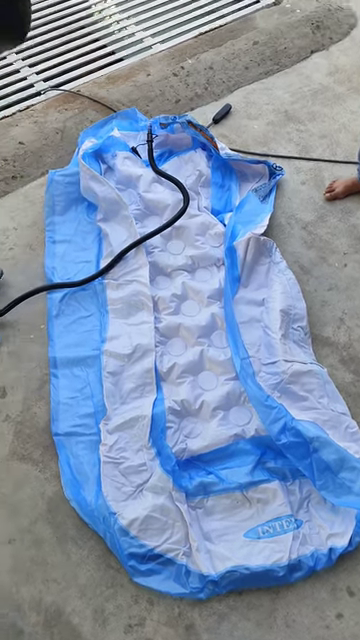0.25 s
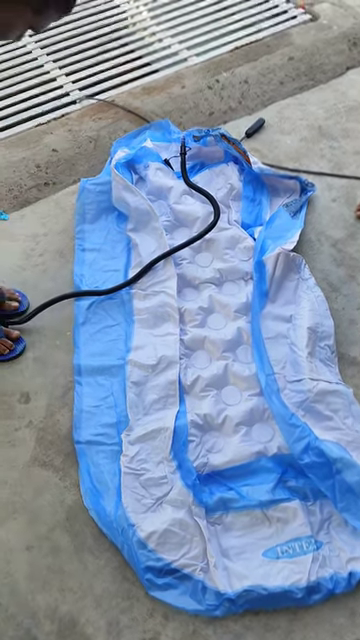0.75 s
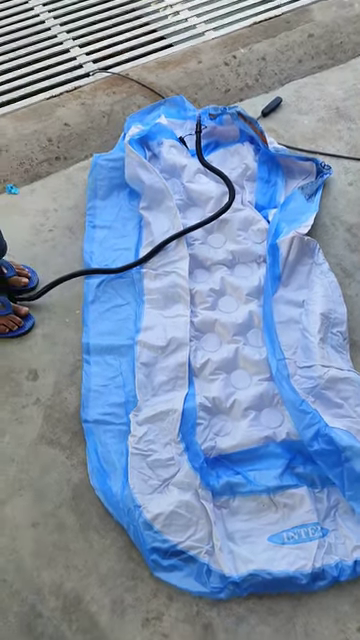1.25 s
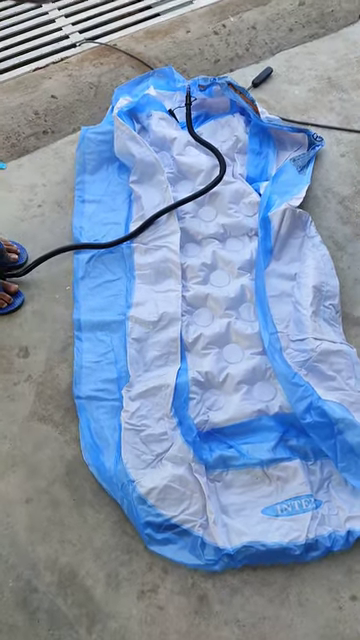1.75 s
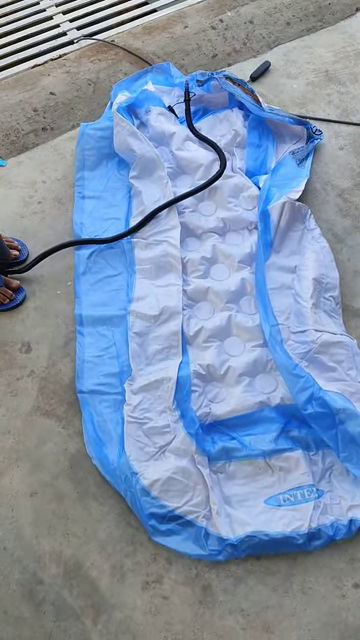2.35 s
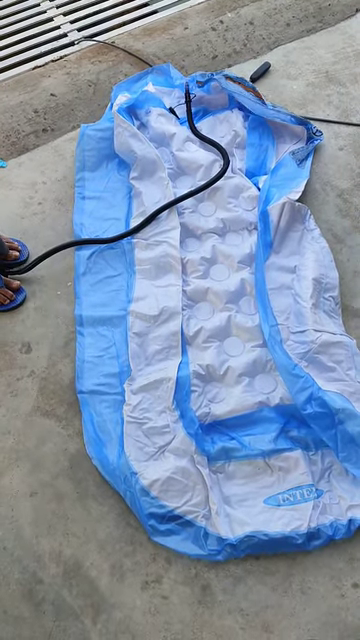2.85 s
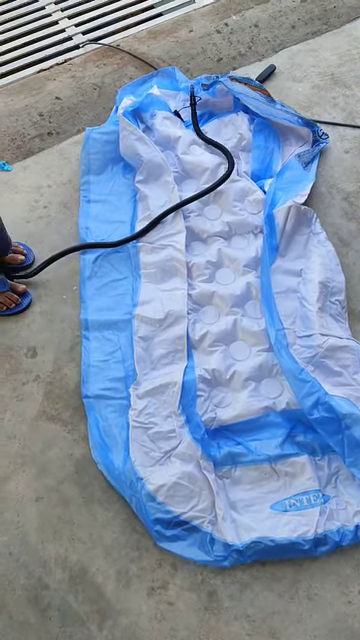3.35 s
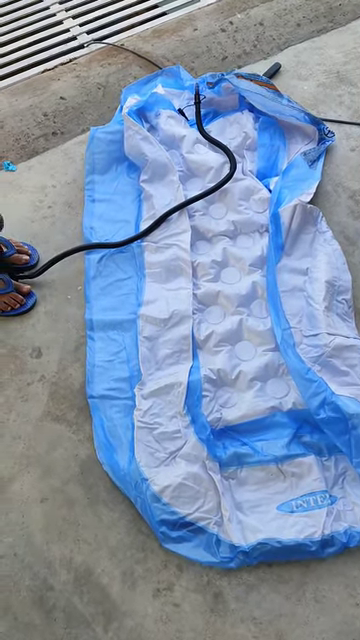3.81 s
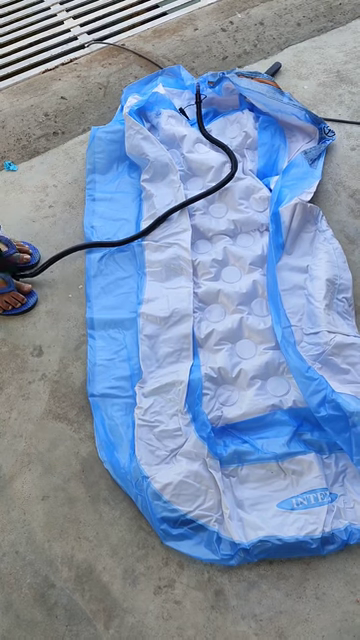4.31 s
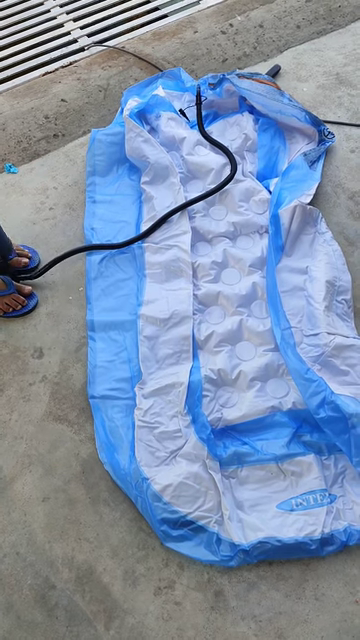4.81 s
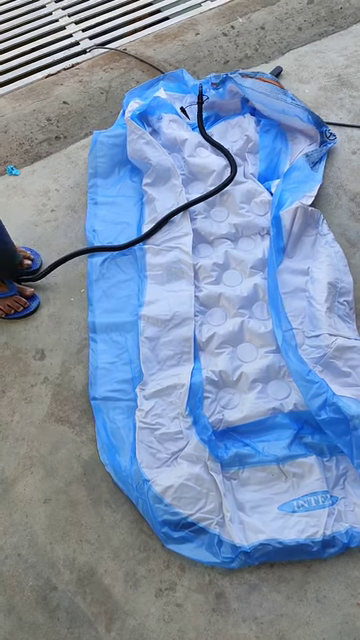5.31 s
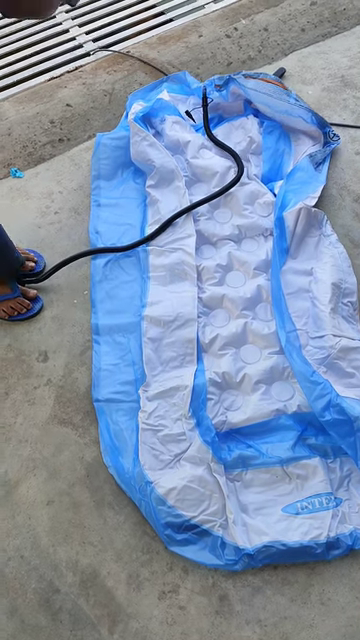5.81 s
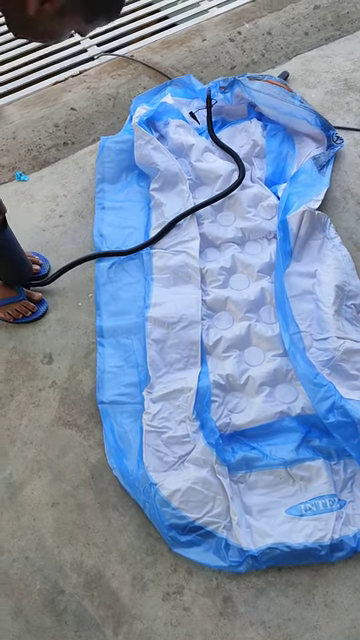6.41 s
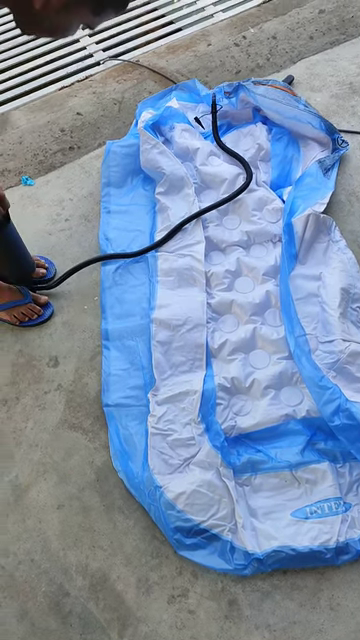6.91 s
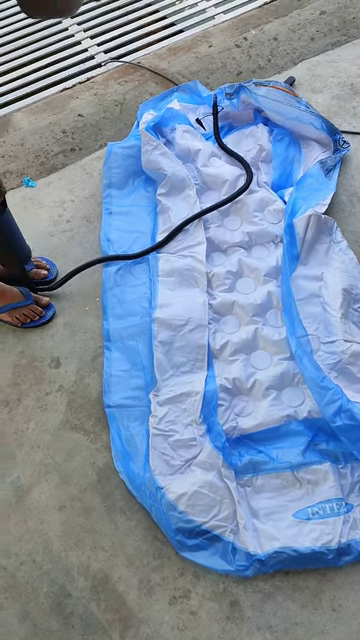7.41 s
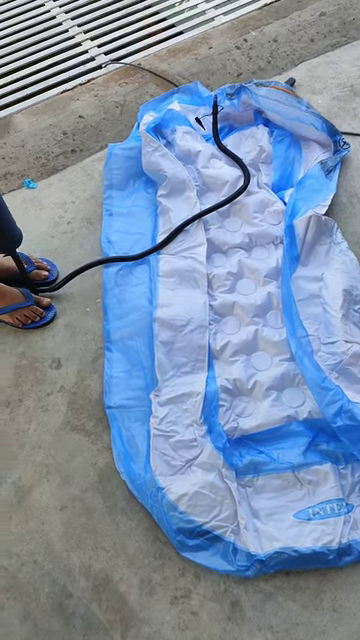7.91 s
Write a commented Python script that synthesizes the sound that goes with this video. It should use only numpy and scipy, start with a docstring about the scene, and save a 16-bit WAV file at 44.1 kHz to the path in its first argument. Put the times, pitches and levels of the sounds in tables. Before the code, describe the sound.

Rhythmic hisses and duller rushes of air come from a clacking foot pump, with steady insect chirr and low outdoor rumble.

```python
"""A knock and a short scuff on concrete, over steady insect chirr and low outdoor rumble; then a pump
is worked stroke after stroke beside a flat inflatable pool. Each push drives a hissing jet with a faint
nozzle whistle through the hose; each return draws a duller rush of air. As the stroke turns, the barrel
thumps and the frame clacks, echoed by the yard walls."""
import sys
import numpy as np
from scipy import signal
from scipy.fft import rfft, irfft
from scipy.io import wavfile
from scipy.ndimage import uniform_filter1d

SR = 44100
rng = np.random.default_rng(int(sys.argv[2]) if len(sys.argv) > 2 else 0)


def unload_audio(sound):
    """Save the sound as a 16-bit wav file, at the path given as the first command line argument."""
    columns = np.transpose(np.atleast_2d(sound))
    # keep every value between -1 and 1, then stretch to whole-number steps
    steps = np.round(np.clip(columns, -1, 1) * 32767)
    wavfile.write(sys.argv[1], SR, steps.astype(np.int16))


N = 359856

# Table levels are relative; each source adds its own gain.
# Outdoor noise spectra: f/Hz, density/dB
WIND_SPECTRUM = [(15, 16.5), (25, -17), (45, 16), (65, -16.0), (100, -45)]
DRONE_SPECTRUM = [(50, -15), (80, 1), (125, 1.5), (170, -4), (210, -1.5), (300, -28.5)]
WASH_SPECTRUM = [(88, -10), (150, -6), (298, -5.5), (938, -11.5), (1250, -18), (1980, -16), (3010, -21),
                 (3860, -17), (4580, 4.5), (6460, -9.5), (8120, -15), (14400, -100)]
INSECT_SPECTRUM = [(2120, -59), (3600, -56), (3780, -72), (4070, -8), (4260, -26), (4360, 3.5), (4760, 2.5),
                   (5400, -3.5), (6420, -18), (6520, -14.5), (9000, -21), (11700, -65), (19800, -120)]
# Outdoor envelopes: t/s, level/dB
WIND_LEVELS = [(0.0, -57), (1.4, -52), (4.1, -52), (4.6, -43.5), (6.1, -51.5), (8.16, -48)]
DRONE_LEVELS = [(0.0, -49), (0.45, -58.5), (4.0, -47.5), (6.0, -52), (8.16, -48)]
INSECT_LEVELS = [(0.0, -40), (3.7, -37.5), (4.4, -38.5), (6.25, -40.5), (6.9, -38.5), (8.16, -40)]
# Drag, return air and jet spectra: f/Hz, density/dB
SCUFF_SPECTRUM = [(71, -33), (120, 0), (289, -11), (350, 2.5), (649, -2), (808, 0), (1040, -6), (1470, -3),
                  (1710, -4.5), (4000, -14), (5200, -47), (8800, -120)]
RUSH_SPECTRUM = [(120, -72), (200, -17), (303, -9), (443, -8.5), (689, -5), (775, -1), (1020, -3.5),
                 (1310, 0), (1490, 6), (2930, 5), (4500, -14), (5850, -57), (9900, -120)]
HISS_SPECTRUM = [(1760, -26), (3000, -30), (3900, 2), (4540, -1.5), (5140, 0), (7180, 2), (8080, 5),
                 (12100, -5), (13700, -1), (14400, -9)]
# Noise-driven resonances: f/Hz, width/Hz, level/dB
SCUFF_RESONANCES = [(347, 37, -2), (504, 38, 1), (813, 53, -2), (1185, 88, -1.5), (1470, 90, -5)]
HOSE_RESONANCES = [(1001, 214, -1), (1636, 44, -3.5), (1967, 270, 0), (2590, 1200, -3.5), (3337, 490, 3)]
NOZZLE_RESONANCES = [(6140, 730, -8.5), (6825, 600, 2.5), (7320, 600, -1), (8190, 220, -7.5)]
# Pump body modes: f/Hz, level/dB, t60/s
BARREL_MODES = [(142.6, -9, 0.094), (177, -7.5, 0.031), (330, -7, 0.027), (416, -7.5, 0.048),
                (556, -2.5, 0.028), (702, -1, 0.032), (822.5, -4, 0.034), (878, -4.5, 0.069)]
FRAME_MODES = [(132, -4, 0.09), (173.2, -1.5, 0.17), (346, 0, 0.042), (438, 3.5, 0.023), (577, 7.5, 0.01),
               (884, -8.5, 0.06), (995, -6, 0.029), (1695, 1.5, 0.011), (2200, 3, 0.0098)]
# Thumps early in the returns: t/s, level/dB
RETURN_THUMPS = [(1.988, -16), (2.544, -12.5), (3.124, -13), (3.703, -13), (4.298, -13.5), (4.897, -13),
                 (5.475, -12.5), (6.054, -12), (6.653, -13), (7.22, -12), (7.806, -12.5)]
# Clacks, bumps, ticks: t/s, level/dB, centre f/Hz, loss below centre/(dB/octave)
TURN_KNOCKS = [(0.0, -29, 173, 9), (1.008, -27, 171, 1), (0.611, -40.5, 590, 11), (1.006, -20.5, 1760, 4.5),
               (1.416, -45.5, 410, -3), (1.737, -24, 2020, 1.9), (1.877, -38.5, 500, 7),
               (2.138, -24.5, 950, 7.5), (2.41, -25, 1700, 5), (2.704, -27.5, 920, 4.5),
               (2.987, -24, 450, 11), (3.276, -28, 980, 4), (3.58, -23.5, 1940, 4.5),
               (3.869, -20.5, 980, 11), (4.155, -25.5, 456, 20), (4.226, -26.5, 586, 5),
               (4.462, -17, 990, 15.5), (4.752, -30, 417, 3.5), (4.825, -27, 834, 4.5),
               (5.053, -18, 1420, 5.5), (5.34, -19.5, 1990, 5), (5.409, -31, 430, 14),
               (5.623, -24, 1120, 4.5), (5.983, -36, 400, 5), (6.231, -31, 890, -4),
               (6.489, -17.5, 2230, 5.5), (6.565, -22, 890, 8), (7.091, -15.5, 880, 11),
               (7.679, -21.5, 2110, 5), (7.739, -25.5, 870, 8), (7.969, -16, 1030, 6)]
# Faint hiss of the opening scuff, then pushes and returns:
# start t/s, length/s, peak level/dB, peak position/fraction
HISS_SWELLS = [(0.0, 0.3, -50.5, 0.4), (0.54, 0.18, -62, 0.43), (0.753, 0.33, -40.5, 0.75),
               (1.02, 0.19, -61, 0.17), (1.287, 0.57, -61, 0.5), (1.588, 0.25, -38.5, 0.57),
               (1.845, 0.35, -41.5, 0.58), (2.158, 0.35, -32.5, 0.57), (2.453, 0.33, -39, 0.45),
               (2.743, 0.34, -31, 0.5), (3.021, 0.36, -39.5, 0.45), (3.331, 0.35, -32, 0.44),
               (3.6, 0.34, -40.1, 0.48), (3.911, 0.36, -32.5, 0.43), (4.196, 0.36, -40, 0.41),
               (4.486, 0.35, -32.5, 0.55), (4.784, 0.36, -39.5, 0.49), (5.098, 0.35, -33, 0.48),
               (5.37, 0.36, -39.5, 0.47), (5.683, 0.33, -32, 0.5), (5.942, 0.35, -40.5, 0.54),
               (6.24, 0.37, -33, 0.51), (6.539, 0.33, -42.5, 0.46), (6.829, 0.36, -33.5, 0.48),
               (7.118, 0.32, -40, 0.49), (7.403, 0.37, -33.5, 0.46), (7.713, 0.36, -39.6, 0.38),
               (8.025, 0.37, -34, 0.35)]
# Left-right coherence: f/Hz, shared power/fraction
YARD_COHERENCE = [(30, 0.65), (70, 0.82), (150, 1), (400, 0.93), (1000, 0.16), (4500, 0.28), (7000, 0.013)]
PUMP_COHERENCE = [(100, .97), (600, 0.62), (1200, 0.57), (2200, 0.44), (4000, 0.46), (7000, 0.38),
                  (10000, 0.22)]
# Microphone port colour: f/Hz, left over right/dB
PORT_BALANCE = [(200, 2), (500, 2), (1000, -4), (1700, 0.5), (2400, 2.5), (3800, 4.5), (5000, 4.5),
                (6500, 6), (7900, 7), (8600, 4), (9300, -1.5), (10000, -0.5), (11500, 4), (14000, 0.5)]
# Slow microphone turn: t/s, left over right/dB
TURN_BALANCE = [(0, -1.5), (5, -2.5), (6.5, -2.5), (8.16, -2.5)]

WASH_DB = -44
SCUFF_START_S, SCUFF_END_S, SCUFF_DB = 0.11, 0.19, -39
SCUFF_RISE_DB_PER_S, SCUFF_FALL_DB_PER_S = 112, 175
ECHO_T60_S, ECHO_DB, ECHO_BUILD_S = .2, -5, .012
UPPER_LOSS_DB_PER_OCT, CRACK_DB, CRACK_T60_S, KNOCK_BUILD_S = 17, -8.5, .04, 0.0019
SPEED_EXPONENT, LEAK_DB, WHISTLE_ONSET_DB = 2.49, -88.5, -39
AIR_LAG_S, KNOCK_LAG_S = 0.00017, 0.00004   # right channel
CUTOFF_HZ = 14800


def from_db(db):
    """Decibels to gain."""
    return 10 ** (np.asarray(db) / 20)


def unit_rms(x):
    """Scale to rms 1."""
    return x / np.sqrt(np.mean(x ** 2) + 1e-20)


def over_time(table):
    """Time table, interpolated per sample."""
    return np.interp(np.arange(N) / SR, *np.transpose(table))


def over_hz(table):
    """Frequency table, interpolated per FFT bin on a log axis."""
    hz, values = np.transpose(table)
    bins_hz = np.maximum(np.arange(N // 2 + 1) * SR / N, 1)
    return np.interp(np.log(bins_hz), np.log(hz), values)


def drift(rate_hz):
    """Slow random wander, rms 1."""
    hop, settle = 40, 2000
    r = np.exp(-2 * np.pi * rate_hz * hop / SR)
    slow = signal.lfilter([1], [1, -2 * r, r * r], rng.standard_normal(N // hop + settle + 2))[settle:]
    return np.interp(np.arange(N) / hop, np.arange(len(slow)), unit_rms(slow))


def noise_pair(coherence, lag_s):
    """Spectra of two partly shared white noises; the right one lags."""
    shared, *own = rfft(rng.standard_normal((3, N)))
    share = np.clip(over_hz(coherence), 0, 1)
    pair = np.sqrt(share) * shared + np.sqrt(1 - share) * np.array(own)
    pair[1] *= np.exp(-2j * np.pi * np.arange(N // 2 + 1) * SR / N * lag_s)
    return pair


def coloured(spectrum, coherence=YARD_COHERENCE, lag_s=0):
    """Shaped stereo noise, rms 1."""
    return unit_rms(irfft(noise_pair(coherence, lag_s) * from_db(over_hz(spectrum)), N))


def patchy(x, depth_db):
    """Uneven turbulence: patches a few hundred Hz wide swell and sink for tens of ms."""
    _, _, cells = signal.stft(x, nperseg=512)
    field = uniform_filter1d(rng.standard_normal(cells.shape[1:]), size=4, axis=0)
    field = uniform_filter1d(field, size=7, axis=1)
    _, uneven = signal.istft(cells * from_db(depth_db * unit_rms(field)), nperseg=512)
    return unit_rms(uneven[:, :N])


def resonant_noise(resonances, waver_db):
    """Noise twice through each resonance; each level wavers on its own."""
    white, out = irfft(noise_pair(PUMP_COHERENCE, AIR_LAG_S), N), 0
    for hz, width_hz, level_db in resonances:
        r = np.exp(-np.pi * width_hz / SR)
        stage = [1, 0, -1, 1, -2 * r * np.cos(2 * np.pi * hz / SR), r * r]
        band = unit_rms(signal.sosfilt([stage, stage], white))
        out = out + from_db(level_db + waver_db * drift(20)) * band
    return unit_rms(out)


def ring(clicks, hz, t60_s):
    """Damped mode: a unit click starts a unit sine."""
    r, w = from_db(-60 / (t60_s * SR)), 2 * np.pi * hz / SR
    return signal.lfilter([0, np.sin(w)], [1, -2 * r * np.cos(w), r * r], clicks + 1e-18)


def yard():
    """Lumpy wind on the ports, low drone, distant wash."""
    wind = from_db(over_time(WIND_LEVELS) + 1.1 * drift(5.3)) * coloured(WIND_SPECTRUM)
    drone = from_db(over_time(DRONE_LEVELS) + 1.0 + 1.2 * drift(4.6)) * coloured(DRONE_SPECTRUM)
    wash = from_db(WASH_DB) * patchy(coloured(WASH_SPECTRUM), depth_db=4.5)
    return wind + drone + wash


def insects():
    """Many far singers blur into a narrow, grainy, throbbing band."""
    grain_db, throb_db = 0.44 * drift(80), 0.7 * drift(7.5)
    return from_db(over_time(INSECT_LEVELS) - 2.0 + grain_db + throb_db) * coloured(INSECT_SPECTRUM)


def scuff():
    """Something drags over the ground and rings: swell, hold, fade."""
    t = np.arange(N) / SR
    rise_db = SCUFF_RISE_DB_PER_S * np.maximum(SCUFF_START_S - t, 0)
    fall_db = SCUFF_FALL_DB_PER_S * np.maximum(t - SCUFF_END_S, 0)
    envelope = from_db(SCUFF_DB - rise_db - fall_db + 2.5 * drift(62))
    friction = coloured(SCUFF_SPECTRUM)
    rings = from_db(-6.5) * resonant_noise(SCUFF_RESONANCES, waver_db=1.0)
    return envelope * (friction + rings)


def wall_echoes(x):
    """Near walls return a dull decaying scatter, partly different per side."""
    t = np.arange(SR // 2) / SR
    left, right, shared = rng.standard_normal((3, len(t)))
    envelope = from_db(-60 * t / ECHO_T60_S) * np.minimum(t / ECHO_BUILD_S, 1) ** 2
    tails = (0.5 * np.array([left, right]) + shared) * envelope
    tails /= np.sqrt(np.sum(tails ** 2, axis=1, keepdims=True))
    tails = signal.sosfilt(signal.butter(1, [250, 1800], "band", fs=SR, output="sos"), tails)
    return from_db(ECHO_DB) * signal.fftconvolve(x[None], tails, axes=1)[:, :N]


def barrel_thumps():
    """Each thump pulls the barrel modes inwards; soft contact acts as a low-pass."""
    starts = [round((start_s + 0.0025) * SR) for start_s, _ in RETURN_THUMPS]
    thump_db = np.array(RETURN_THUMPS)[:, 1]
    spreads_db = 1.5 * rng.standard_normal((len(starts), len(BARREL_MODES)))
    out = np.zeros(N)
    for (hz, mode_db, t60_s), spread_db in zip(BARREL_MODES, spreads_db.T):
        clicks = np.zeros(N)
        clicks[starts] = from_db(thump_db + mode_db + spread_db)
        out -= ring(clicks, hz, t60_s)
    return signal.sosfilt(signal.butter(4, 1050, fs=SR, output="sos"), out)


def frame_knocks():
    """Each knock rings the frame and cracks near its own pitch; uneven contact scatters mode phases."""
    out, t = np.zeros(N), np.arange(SR // 10) / SR
    hz, mode_db, t60_s = np.transpose(FRAME_MODES)[:, :, None]
    noises = rng.standard_normal((len(TURN_KNOCKS), len(t)))
    phases_rad = rng.uniform(-1.1, 1.14, (len(TURN_KNOCKS), len(FRAME_MODES), 1))
    onset = np.sin(np.pi / 2 * np.minimum(t / KNOCK_BUILD_S, 1)) ** 2
    for knock, noise, phase_rad in zip(TURN_KNOCKS, noises, phases_rad):
        start_s, level_db, centre_hz, lower_db_per_oct = knock
        octaves = np.log2(hz / centre_hz)
        loss_db = np.where(octaves > 0, UPPER_LOSS_DB_PER_OCT, -abs(lower_db_per_oct)) * octaves
        modes = from_db(mode_db - loss_db - 60 * t / t60_s) * np.sin(2 * np.pi * hz * t + phase_rad)
        band = signal.butter(2, [centre_hz * 0.57, centre_hz * 1.7], "band", fs=SR, output="sos")
        crack = from_db(CRACK_DB - 60 * t / CRACK_T60_S) * unit_rms(signal.sosfilt(band, noise))
        i = round((start_s + 0.0009) * SR)
        out[i:i + len(t)] += from_db(level_db) * onset * (crack - modes.sum(axis=0))
    return out


def flow_level_db():
    """Scuff hiss, then piston strokes: speed follows quarter sines; swells and a leak add as power."""
    start_s, length_s, peak_db, peak_at = np.transpose(HISS_SWELLS)[:, :, None]
    t = np.arange(0, N, 32) / SR
    progress = (t - start_s) / length_s
    speed_up = np.sin(np.pi / 2 * np.clip(progress / peak_at, 0, 1))
    slow_down = np.sin(np.pi / 2 * np.clip((1 - progress) / (1 - peak_at), 0, 1))
    swells = from_db(peak_db) * (speed_up * slow_down) ** SPEED_EXPONENT
    power = np.sum(swells ** 2, axis=0) + from_db(LEAK_DB) ** 2
    return np.interp(np.arange(N) / SR, t, 10 * np.log10(power))


def pumped_air():
    """Jet hiss, hose rush and nozzle whistle follow the flow and flutter together."""
    flow_db = flow_level_db()
    flutter = from_db(drift(19.3))
    jet = patchy(coloured(HISS_SPECTRUM, PUMP_COHERENCE, AIR_LAG_S), depth_db=1.5)
    hiss = from_db(flow_db + 6.5) * jet
    hose = patchy(coloured(RUSH_SPECTRUM, PUMP_COHERENCE, AIR_LAG_S), depth_db=3.0)
    hose += from_db(-4.5) * resonant_noise(HOSE_RESONANCES, waver_db=2.5)
    rush = from_db(-36.0 + 0.68 * (flow_db + 38)) * hose   # grows slower than the hiss
    gate = 1 / (1 + np.exp(-(flow_db - WHISTLE_ONSET_DB) / 2.0))   # opens once the jet is fast enough
    whistle = from_db(flow_db + 7.5) * gate * resonant_noise(NOZZLE_RESONANCES, waver_db=-1.0)
    return flutter * (hiss + rush + whistle)


def scene():
    """Pump impacts with echoes, pumped air, scuff, insects and yard, in stereo."""
    bass_cut = signal.butter(2, 80, "high", fs=SR, output="sos")   # a small pump radiates little bass
    impacts = signal.sosfilt(bass_cut, from_db(-7.5) * barrel_thumps() + frame_knocks())
    lagged = np.interp(np.arange(N) - KNOCK_LAG_S * SR, np.arange(N), impacts)
    pump = np.array([impacts, lagged]) + wall_echoes(impacts) + pumped_air()
    return pump + scuff() + insects() + yard()


def record(dry):
    """Slowly turning microphone: two ports of unequal colour, steep treble cut."""
    tilt = from_db(over_hz(PORT_BALANCE) / 2)
    turn = from_db(over_time(TURN_BALANCE) / 2)
    ported = irfft(rfft(dry) * [tilt, 1 / tilt], N) * [turn, 1 / turn]
    return signal.sosfilt(signal.cheby2(20, 80, CUTOFF_HZ, fs=SR, output="sos"), ported)


dry = scene()
out = record(dry)
unload_audio(out)
```